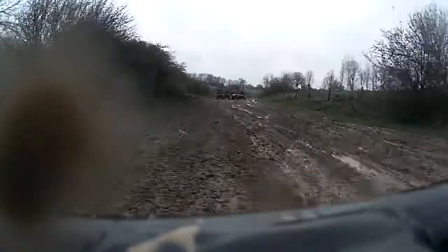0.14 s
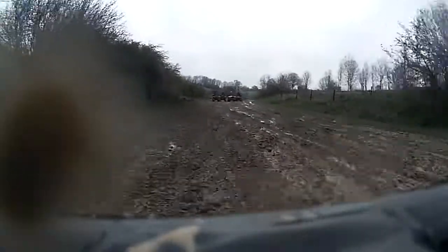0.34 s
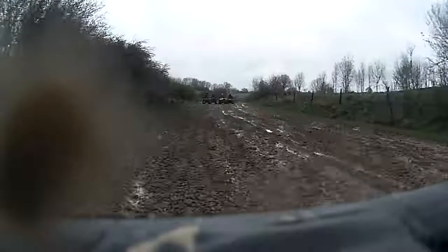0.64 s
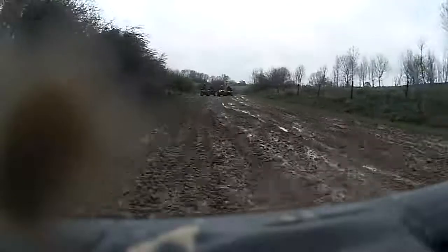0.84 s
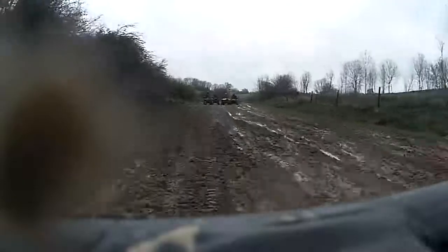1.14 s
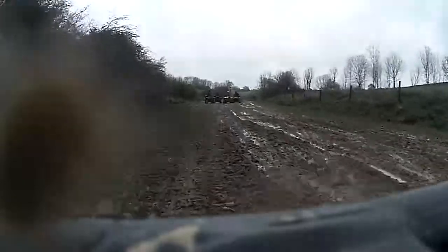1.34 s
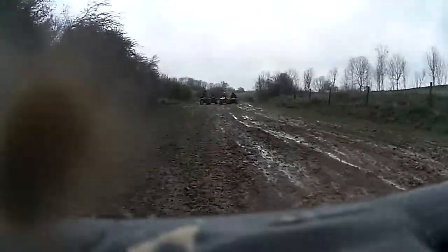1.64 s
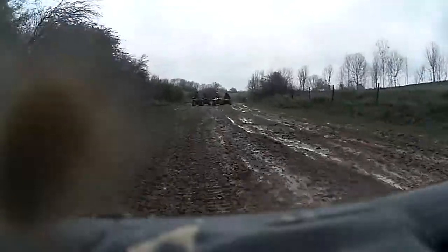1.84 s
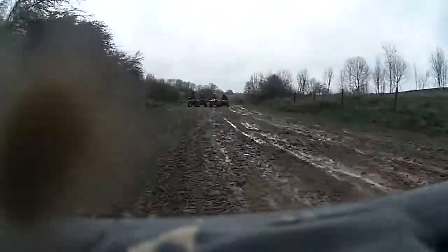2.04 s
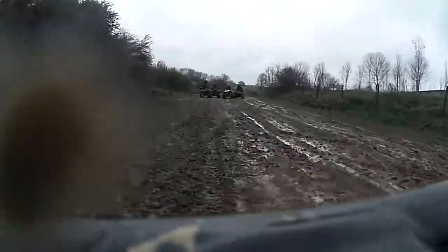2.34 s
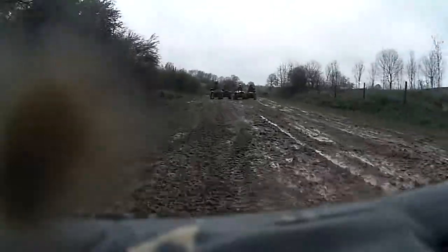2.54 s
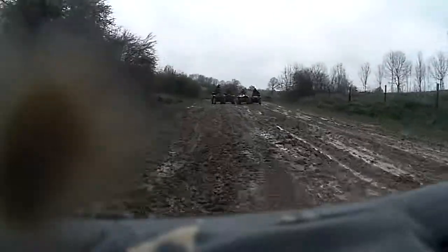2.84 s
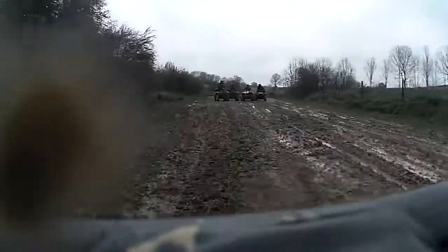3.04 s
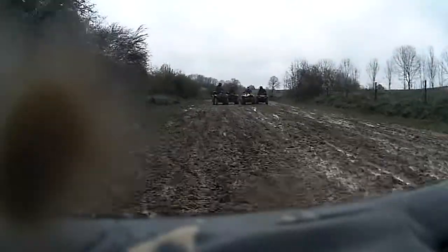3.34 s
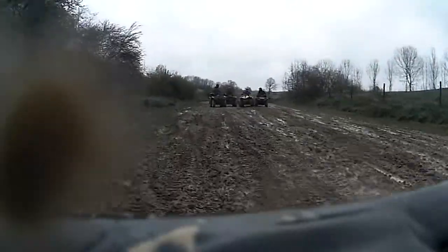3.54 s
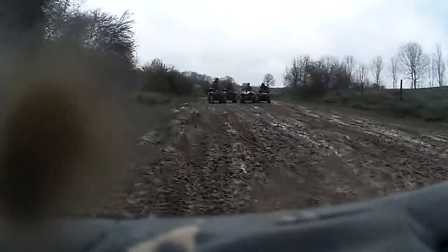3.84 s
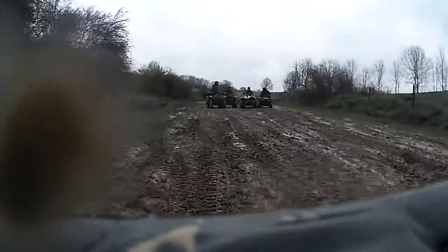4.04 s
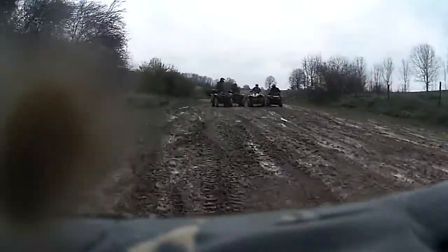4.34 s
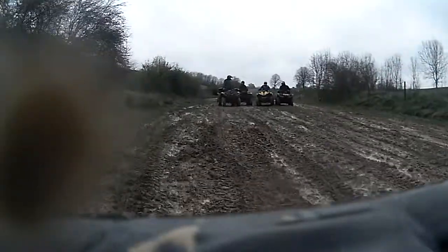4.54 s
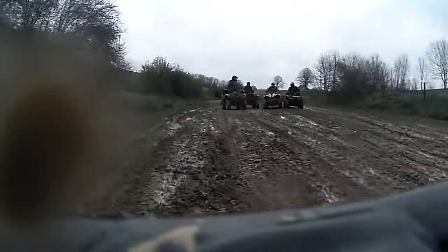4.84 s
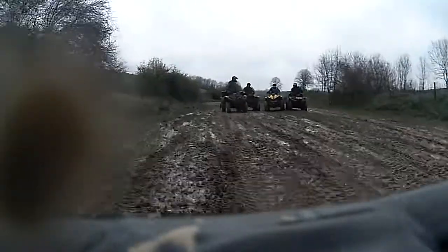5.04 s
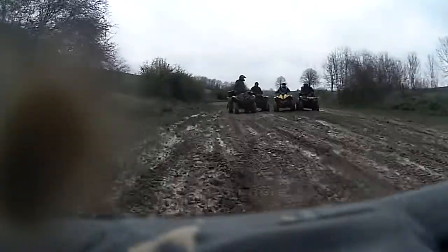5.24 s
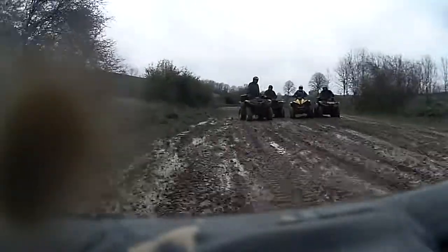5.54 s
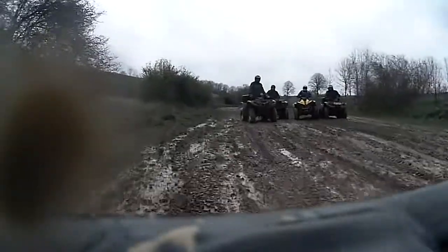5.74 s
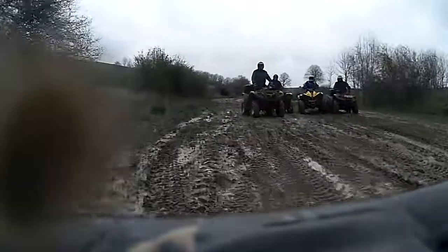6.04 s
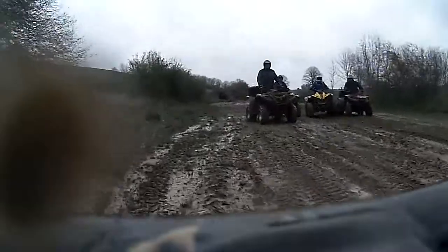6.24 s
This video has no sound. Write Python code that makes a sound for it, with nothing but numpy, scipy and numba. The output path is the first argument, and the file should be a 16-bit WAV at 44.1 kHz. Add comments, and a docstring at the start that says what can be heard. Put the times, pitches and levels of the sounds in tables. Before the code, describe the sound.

A single-cylinder quad bike throbs along a muddy track, bodywork knocking over ruts, then coasts down to a low putter and blips the throttle twice.

```python
"""Quad bike on a muddy track

A single-cylinder quad is heard from a microphone in a closed case on its bodywork. The exhaust, made of multiples of
the firing rate, throbs with the throttle, dies back as the quad coasts and picks up twice near the end. Clatter and buzz
ring the panels, engine cases and microphone case. Ruts knock the bodywork, gears whine as swept tones, tyres churn
mud from coloured grains of noise, flecks tick on the case and the suspension chirps faintly in narrow noise."""
import sys
import numpy as np
from scipy import signal
from scipy.fft import rfft, irfft
from scipy.io import wavfile
from scipy.ndimage import uniform_filter1d
from numba import njit

SR = 44100
rng = np.random.default_rng(int(sys.argv[2]) if len(sys.argv) > 2 else 0)


def unload_wav(signal):
    """Save mono or channel-first audio to the path in sys.argv[1] as 16-bit WAV at rate SR, clipped to [-1, 1]."""
    wavfile.write(
        sys.argv[1],
        SR,
        np.round(np.clip(np.atleast_2d(signal).T, -1, 1) * 32767).astype(np.int16),
    )


N = 281799
TIME = np.arange(N) / SR

# Resonances of the microphone case. Each row: centre in Hz, half-width in Hz, relative level in dB.
SHELL_MODES = [(2784, 47, -12), (2880, 39, -5.5), (3040, 240, -7), (3395, 96, -3.5), (3580, 180, -2.5),
               (3827, 170, 5.5), (3993, 82, -1.5), (4290, 140, -7.5)]
# Hollow body of a plastic knock. Each row: frequency in Hz, relative level in dB.
HOLLOW_TONE = [(200, -37), (500, -6), (600, 5.5), (850, -0.5), (1100, -1.5), (2000, -53)]
# Bright edge of a plastic knock. Each row: frequency in Hz, relative level in dB.
CRACK_TONE = [(700, -19.5), (1150, 5), (1750, -1), (2250, -17), (4000, -18), (4800, -39)]


def undb(db):
    """Decibels to gain."""
    return 10 ** (np.asarray(db) / 20)


def unit(x):
    """Scale to rms 1."""
    return x / np.sqrt(np.mean(x ** 2))


def curves(table):
    """The columns of a table after its times, drawn as straight lines with one value per sample."""
    s, *columns = np.transpose(table)
    return [np.interp(TIME, s, c) for c in columns]


def add(out, s, sound):
    """Mix a short sound in at s seconds."""
    start = int(s * SR)
    out[start:start + len(sound)] += sound[:N - start]


def walk(rate):
    """Slow random drift: steps lasting 1 / rate seconds, smoothed twice over that length; rms 1."""
    k = int(SR / rate)
    steps = np.repeat(rng.standard_normal(N // k + 1), k)
    return unit(uniform_filter1d(uniform_filter1d(steps, k), k)[:N])


def colour(x, points, size=4096):
    """Minimum-phase filter whose response follows the given (Hz, dB) outline."""
    hz, db = np.transpose(points)
    bins = np.maximum(np.fft.rfftfreq(size, 1 / SR), 1)
    outline_db = np.interp(np.log(bins), np.log(hz), db)
    # folding the cepstrum forward in time makes the filter causal
    cepstrum = irfft(np.log(undb(outline_db)))
    cepstrum[1:size // 2] *= 2
    cepstrum[size // 2 + 1:] = 0
    impulse = irfft(np.exp(rfft(cepstrum)))
    return signal.fftconvolve(x, impulse)[:len(x)]


def band(x, hz, width):
    """One resonance of the given width in Hz, gain 1 at its centre."""
    return signal.lfilter(*signal.iirpeak(hz, hz / width, SR), x)


def ring(x, modes):
    """A body of resonances, each filtered twice for steep sides and dark valleys between; rms 1."""
    total = 0
    for hz, half_width, db in modes:
        once = band(x, hz, 2 * half_width)
        total = total + undb(db) * band(once, hz, 2 * half_width)
    return unit(total)


def grains(rate, spread_db):
    """Tiny impacts at random, rate per second, a few made larger by an exponential spread in dB; rms 1."""
    size = undb(spread_db * np.minimum(rng.exponential(size=N), 4))
    struck = rng.random(N) < rate / SR
    return unit(struck * size * rng.standard_normal(N))


def held(start, end, attack_s, release_s):
    """Envelope from 0 to 1: attack from start, hold, release from end."""
    attack = np.clip((TIME - start) / attack_s, 0, 1)
    return attack * np.clip(1 - (TIME - end) / release_s, 0, 1)


def ride():
    """The quad's motion, which drives the levels: firing rate in Hz, throttle opening and ground speed."""
    # Engine speed. Each row: time in seconds, firing rate in Hz.
    revs = [(0.0, 26.7), (0.2, 29.6), (0.6, 30.3), (0.85, 29.2), (1.28, 29.1), (1.55, 32.0), (1.64, 31.3),
            (1.74, 34.2), (1.84, 30.6), (1.97, 30.0), (2.1, 27.1), (2.45, 26.6), (3.0, 23.6), (3.35, 22.1),
            (3.6, 22.3), (4.32, 19.6), (4.92, 18.4), (5.11, 27.4), (5.25, 28.9), (5.47, 26.2), (5.71, 31.2),
            (5.99, 24.9), (6.39, 25.0)]
    # Pulls on the throttle. Each row: opens in seconds, closes in seconds, opening from 0 to 1.
    pulls = [(0.035, 0.617, 0.73), (1.304, 1.76, 0.9), (5.025, 5.294, 0.47), (5.45, 5.73, 0.63)]
    # Ground speed, falling as the quad coasts. Each row: time in seconds, share of top speed.
    speeds = [(0, 1.0), (2.2, 0.81), (3.4, 0.3), (4.7, 0.21), (6.39, 0.26)]
    open_s, close_s = 0.08, 0.22
    throttle = sum(opening * held(start, end, open_s, close_s) for start, end, opening in pulls)
    return curves(revs)[0], throttle, curves(speeds)[0]


def loudness(state, db, octave_db=0, throttle_db=0, speed_db=0):
    """Gain of a part: db at cruising revs, shut throttle and top speed, shifted by revs, throttle and speed."""
    hz, throttle, speed = state
    cruise_hz = 26
    revs_db = octave_db * np.log2(hz / cruise_hz)
    return undb(db + revs_db + throttle_db * throttle + speed_db * (speed - 1))


def lull():
    """Gain for clatter and spray that eases briefly twice and lifts very slightly at the end."""
    # Bell-shaped changes. Each row: middle in seconds, half length in seconds, change in dB.
    dips = [(2.067, 0.068, -2.5), (3.55, 0.077, -4), (6.39, 0.064, 0.5)]
    return undb(sum(db * np.exp(-((TIME - s) / half_s) ** 2) for s, half_s, db in dips))


def through_case(x, edge_hz=4520):
    """The closed case lets little through above its own resonances: a steep low-pass."""
    return signal.sosfilt(signal.butter(18, edge_hz, fs=SR, output="sos"), x)


@njit
def repeat(x, period, keep):
    """Feed each engine cycle into the next, so that the same parts strike at the same crank angles."""
    y = x.copy()
    for i in range(len(x)):
        place = i - period[i]
        if place >= 0:
            k = int(place)
            y[i] += keep * (y[k] + (place - k) * (y[k + 1] - y[k]))
    return y


def clatter(hz, turns, keep, throb, spread_db):
    """Impacts that partly recur every cycle and swell with each firing."""
    strikes = repeat(grains(3000, spread_db), SR / hz, keep)
    return strikes * (1 + throb * np.cos(2 * np.pi * turns))


def buzz(turns, sway_db=3):
    """The smooth part of the engine's shaking: many clean multiples of the firing rate, each swaying slowly."""
    phases = rng.random(40)
    total = 0
    for k in range(6, 40):
        total = total + undb(sway_db * walk(3.996)) * np.cos(2 * np.pi * (k * turns + phases[k]))
    return unit(total)


def exhaust(turns, state):
    """Six multiples of the firing rate: three throb under load, three boom on the overrun, the top two at low revs."""
    # Throb at twice the firing rate. Each row: time in seconds, level in dB.
    throb_levels = [(0, -34), (0.2, -32), (0.6, -29), (0.95, -32), (1.28, -30.5), (1.62, -28),
                    (1.75, -24.5), (2.15, -38), (2.6, -42), (3.15, -53), (3.4, -45.5), (4.88, -42.5),
                    (5.2, -31), (5.48, -34.5), (5.76, -27.5), (6.0, -37.5), (6.39, -37)]
    # Bark at three times the firing rate. Each row: time in seconds, level in dB.
    bark_levels = [(0, -43), (0.17, -30), (0.6, -35), (1.05, -42), (1.4, -34), (1.75, -29.5), (2.1, -48),
                   (3.5, -50), (4.0, -43.5), (4.8, -43), (5.2, -36.5), (5.45, -39), (5.75, -33.5),
                   (5.98, -43), (6.39, -37)]
    # Hollow boom at four times the firing rate. Each row: time in seconds, level in dB.
    boom_levels = [(0, -49), (2.76, -47), (2.92, -34.5), (3.15, -34.5), (3.52, -48), (3.75, -40),
                   (4.45, -35.5), (5.03, -35.5), (5.2, -43), (5.82, -46), (6.0, -37), (6.39, -39.5)]
    throb, bark, boom = (undb(curves(table)[0]) for table in (throb_levels, bark_levels, boom_levels))
    first = throb * loudness(state, db=-22, octave_db=7, throttle_db=12.0)
    fifth = boom * loudness(state, db=-17.0, octave_db=-18.5)
    sixth = boom * loudness(state, db=-20.0, octave_db=-21.0)
    # the boom is reflected from the open end of the pipe, upside down
    gains = [first, throb, bark, -boom, -fifth, -sixth]
    # the silencer's chambers hold higher multiples back a little, smearing each pulse
    smear_turns, waver_db = .025, 1.0
    out = np.zeros(N)
    for k, gain in enumerate(gains, 1):
        wave = np.cos(2 * np.pi * (k * turns - smear_turns * k * k))
        out -= np.sqrt(2) * gain * undb(waver_db * walk(20)) * wave
    return out


def valves(turns, state, hz=4350, half_width_hz=450):
    """The valve gear ticks once per cycle, harder at high revs: noise pulses through one resonance."""
    sharpness = 5
    tick = np.exp(sharpness * np.cos(2 * np.pi * turns)) * rng.standard_normal(N)
    return ring(tick, [(hz, half_width_hz, 0)]) * loudness(state, db=-68.5, octave_db=22, throttle_db=3)


def rack(shaking, state, hz=806, half_width_hz=42, noise_db=14.5):
    """The luggage rack rings on at one pitch from noise, while multiples of the firing rate glide through it."""
    driven = shaking + rng.standard_normal(N) * undb(noise_db)
    return ring(driven, [(hz, half_width_hz, 0)]) * loudness(state, db=-44.5, speed_db=4)


def growl(turns, state, gulp=0.18):
    """The airbox snarls as the throttle opens: high multiples of the firing rate, in one uneven gulp per cycle."""
    hz, half_width_hz, rough_db, jitter_turns = 812, 105, 2.5, .005
    snarl = ring(buzz(turns + jitter_turns * walk(40)), [(hz, half_width_hz, 0)])
    snarl = snarl * undb(rough_db * walk(60)) * (1 + gulp * np.cos(2 * np.pi * turns))
    throttle = state[1]
    return unit(snarl) * throttle * loudness(state, db=-43.0, octave_db=15, speed_db=5.5)


def engine(state, drone_buzz_db=-1, case_buzz_db=-11):
    """Exhaust, airbox, valves and rack, with clatter and buzz that ring the panels and cases."""
    # Body panels. Each row: centre in Hz, half-width in Hz, relative level in dB.
    panel_modes = [(236, 13, -16), (338.7, 34.5, 2), (325, 32, -31), (363, 31, -1), (432.4, 12, -10)]
    # Metal engine cases. Each row: centre in Hz, half-width in Hz, relative level in dB.
    case_modes = [(605.7, 19, -3.5), (656, 51.5, 1), (746, 28.4, -2), (882, 100, -3.5), (1021, 33, -11),
                  (1137, 20, -9), (1387, 41, -6.5), (1467, 30, -7), (1596, 45, -9), (1828, 28, -7),
                  (1903, 23.6, -4.5), (2162, 23, -11), (2294, 28, -12.5)]
    hz = state[0]
    turns = np.cumsum(hz) / SR
    shaking = buzz(turns)
    ease = lull()
    panel_clatter = ring(clatter(hz, turns, keep=0.17, throb=0.27, spread_db=0.0), panel_modes)
    drone = unit(panel_clatter + undb(drone_buzz_db) * ring(shaking, panel_modes))
    case_clatter = clatter(hz, turns, keep=0.44, throb=0.066, spread_db=3.0)
    cases = ring(case_clatter + undb(case_buzz_db) * shaking, case_modes) * ease
    # the rasp is clatter ringing the microphone case
    rasp = ring(clatter(hz, turns, keep=0.51, throb=0.15, spread_db=0), SHELL_MODES) * ease
    return (exhaust(turns, state) + growl(turns, state) + valves(turns, state) + rack(shaking, state) * ease
            + drone * loudness(state, db=-40, octave_db=4.5, throttle_db=4.0, speed_db=6)
            + cases * loudness(state, db=-47, octave_db=5, throttle_db=2.5, speed_db=3.0)
            + rasp * loudness(state, db=-53.0, octave_db=-1.0, throttle_db=6.0, speed_db=2.0))


def whines(state, centre_hz=355, width_hz=47, wobble_hz=3.43, flutter_db=3.0):
    """Gear tones follow the revs and sing out as they cross a panel resonance, mostly on the overrun."""
    # Each row: multiple of the firing rate, level in dB at shut throttle and top speed, change at full throttle in dB.
    gear_tones = [(14, -36.5, -14), (16, -39.5, -14)]
    out = np.zeros(N)
    for multiple, db, throttle_db in gear_tones:
        hz = multiple * state[0] + wobble_hz * walk(20)
        resonance = 1 / (1 + ((hz - centre_hz) / width_hz) ** 4)
        gain = loudness(state, db=db, throttle_db=throttle_db, speed_db=14.5) * undb(flutter_db * walk(40))
        out += resonance * gain * np.sin(2 * np.pi * np.cumsum(hz) / SR)
    return out


def panel_hum(state, hz=335, pull_hz=3.5, wobble_hz=3, flutter_db=3.0):
    """Under load one panel sings at its own pitch, pulled a little by the revs."""
    level_db, closed = -34.5, .22  # closed: share left when the throttle is shut
    pitch = hz + pull_hz * (state[0] - 29.5) + wobble_hz * walk(30)
    gain = (closed + state[1]) * undb(level_db + flutter_db * walk(40))
    gain = gain * loudness(state, db=-1, octave_db=7, speed_db=7)
    return gain * np.sin(2 * np.pi * np.cumsum(pitch) / SR)


def rattles():
    """Lumps of mud tap the hollow mudguards: random strikes, each a decaying burst of noise."""
    rate, decay_s, level_db, crack_db = 45, 0.0071, -2, -10  # rate in strikes per second
    strikes = (rng.random(N) < rate / SR) * rng.random(N)
    envelope = signal.lfilter([1], [1, -np.exp(-1 / (decay_s * SR))], strikes)
    chatter = envelope * rng.standard_normal(N)
    taps = colour(chatter, HOLLOW_TONE) + undb(crack_db) * colour(chatter, CRACK_TONE)
    return unit(taps) * undb(level_db)


def track(state):
    """Tyres rumble through ruts and fling a crackling spray of mud, more at speed; puddles splash over the case."""
    # Wet hollows. Each row: middle in seconds, half length in seconds, splash level in dB, change in rumble in dB.
    wet_hollows = [(0.1, 0.28, -53.5, -4.5), (1.718, 0.17, -50, 3.5)]
    # Tone of the mud spray. Each row: frequency in Hz, relative level in dB.
    mud_tone = [(450, -15), (620, 5), (1000, 3.5), (1500, -14.5), (2100, -6.5), (2900, -2), (3900, 2.5),
                (4350, -7.5), (4650, -27), (7200, -15), (9000, -21.5), (15000, -28)]
    # Tone of the tyre rumble. Each row: frequency in Hz, relative level in dB.
    rumble_tone = [(10, -9), (25, -7), (45, -8.5), (72, 5), (105, 1.5), (150, -7), (250, -9), (450, -12),
                   (700, -54.5)]
    splash, jolt_db = 0, 0
    for s, half_s, splash_db, rumble_db in wet_hollows:
        depth = np.exp(-((TIME - s) / half_s) ** 2)
        splash = splash + undb(splash_db) * depth
        jolt_db = jolt_db + rumble_db * depth
    thrown = loudness(state, db=-49.5, throttle_db=0.4, speed_db=8.5) * lull()
    rolling = loudness(state, db=-38.5, throttle_db=3, speed_db=5.0) * undb(jolt_db)
    rumble = unit(colour(grains(900, 1.6), rumble_tone)) * rolling * undb(1.86 * walk(9.4))
    spray = unit(colour(grains(4000, 0.89), mud_tone)) * thrown * undb(1.8 * walk(21.77))
    wash = band(colour(grains(2500, 3.5), mud_tone), 3700, 2500)
    slosh = unit(through_case(wash)) * splash
    return rumble + spray + slosh + rattles() * thrown


def hiss(level_db=-62.5):
    """Faint even hiss of the microphone: coloured noise at a steady level."""
    # Each row: frequency in Hz, relative level in dB.
    hiss_tone = [(2800, -8.5), (5200, 0.5), (7000, -5), (9000, -6), (10300, -1.5), (14500, -7),
                 (15600, -4.5)]
    return unit(colour(rng.standard_normal(N), hiss_tone)) * undb(level_db)


def knocks(tail_s=0.075, tail_db=-22, width_hz=150, ring_db=11, hollow_db=-14.5, crack_db=-14.0, lead_s=0.00453):
    """Loose plastic bodywork slaps at each rut and chatters briefly: a hollow ring and a brighter crack."""
    # Each row: time in seconds, hollow level in dB and crack level in dB (both before trim), ring pitch in Hz.
    rut_hits = [(0.206, -32.5, -43, 820), (0.510, -24, -38, 780), (0.636, -26, -42, 593),
                (1.123, -35, -32.5, 625), (1.261, -29, -42.5, 770), (1.3, -33, -44, 730),
                (1.497, -21.5, -31.5, 850), (1.619, -24.5, -33, 603), (1.723, -32, -39.5, 780),
                (1.801, -27.5, -53, 795), (1.934, -27.5, -36, 637), (1.963, -32, -50, 610),
                (2.123, -22, -36, 714), (2.169, -39, -41, 620), (2.2, -33.5, -35.5, 630),
                (2.426, -43, -42, 804), (2.541, -32, -47, 570), (2.662, -35, -46, 796),
                (2.777, -46, -41, 818), (2.827, -31.5, -34.5, 760), (2.911, -31.5, -47, 616),
                (3.048, -36, -42.5, 620), (3.133, -38, -44, 607), (3.453, -38, -46, 825),
                (3.546, -38, -49, 807), (3.628, -30, -47, 700), (3.744, -31, -39.5, 780),
                (3.887, -33.5, -46, 810), (4.019, -29.5, -42.5, 680), (4.283, -31, -43, 745),
                (4.376, -33.5, -46, 638), (4.526, -39.5, -48, 770), (5.951, -36, -49, 794),
                (6.019, -30.5, -42, 736), (6.179, -32, -38, 726)]
    out, t = np.zeros(N), TIME[:SR // 10]
    rise_s, decay_s, slap, crack_s = .004, .005, .35, .02
    fall = np.exp(-t / decay_s) + undb(tail_db) * np.exp(-t / tail_s)
    contact = (1 - np.exp(-(t / rise_s) ** 2)) * fall
    for s, low_db, high_db, hz in rut_hits:
        chatter = contact * rng.standard_normal(len(t))
        # one sharp slap amid the chatter
        chatter[int(rise_s * SR)] += slap * np.linalg.norm(chatter)
        hollow = colour(chatter, HOLLOW_TONE)
        hollow = unit(hollow + undb(ring_db) * band(hollow, hz, width_hz))
        crack = unit(colour(chatter * np.exp(-(t / crack_s) ** 2), CRACK_TONE))
        knock = undb(low_db + hollow_db) * hollow + undb(high_db + crack_db) * crack
        # each knock starts slightly ahead of its listed time, so its swell peaks there
        add(out, s - lead_s, knock)
    return out


def flecks(decay_s=0.0075, gain_db=-6, spit_db=-27, spit_hz=5200, spit_width_hz=3000, ring_hz=3950, ring_width_hz=350):
    """Small clots of mud patter on the microphone case: decaying noise rings it, with a faint wet spit."""
    # Each row: start in seconds, level in dB before trim.
    clots = [(0.5567, -34), (0.642, -32), (0.955, -27), (1.5764, -27.5), (2.5083, -29), (2.659, -30.5),
             (2.825, -33), (2.93, -32), (4.4132, -34), (4.461, -30), (4.544, -28.5), (6.192, -39)]
    out, t = np.zeros(N), TIME[:SR // 20]
    for s, db in clots:
        splat = np.exp(-t / decay_s) * rng.standard_normal(len(t))
        shell = ring(splat, SHELL_MODES)
        tick = through_case(shell + 2 * band(shell, ring_hz, ring_width_hz))
        tick = undb(db + gain_db) * tick / np.abs(tick).max()
        spit = undb(db + spit_db) * band(splat, spit_hz, spit_width_hz)
        add(out, s, tick + spit)
    return out


def chirps(width_hz=400, scratch_width_hz=3000):
    """Short, thin, scratchy squeaks of wet suspension joints: noise narrowed by two resonances."""
    # Each row: start in seconds, length in seconds, pitch in Hz, level in dB before the swell and fade.
    squeaks = [(1.015, .04, 10200, -66), (1.16, .04, 10000, -65), (1.5, .045, 6700, -54),
               (1.495, .07, 10000, -57), (1.845, .045, 10000, -64), (2.06, .07, 10000, -59),
               (2.095, .03, 10700, -62), (5.965, .05, 9900, -54), (6.115, .04, 10200, -61),
               (6.18, .025, 10900, -63)]
    out = np.zeros(N)
    for s, length, hz, db in squeaks:
        rub = rng.standard_normal(int(length * SR))
        squeak = unit(band(band(rub, hz, scratch_width_hz), hz, width_hz))
        add(out, s, undb(db) * np.hanning(len(rub)) * squeak)
    return out


def steady_whine(attack_s=0.021, release_s=0.068, wobble_hz=1.58, flutter_db=3.3):
    """A tone comes and goes while the quad rolls slowly and pulls away, all but holding its pitch each time."""
    # Each row: start in seconds, stop in seconds, pitch in Hz, level in dB before flutter.
    spells = [(4.26, 4.427, 423, -46.5), (4.768, 4.984, 395, -43.5), (5.096, 5.346, 424, -39.5),
              (5.153, 5.85, 222.5, -50), (5.5, 5.87, 427.7, -41.5), (6.13, 6.39, 424, -43.5)]
    wobble, flutter = wobble_hz * walk(20), undb(flutter_db * walk(29))
    out = np.zeros(N)
    for start, end, hz, db in spells:
        tone = np.sin(2 * np.pi * np.cumsum(hz + wobble) / SR)
        out += undb(db) * held(start, end, attack_s, release_s) * tone
    return flutter * out


def scene():
    """Everything reaches the one microphone on the bodywork; engine and knocks pass through its case."""
    state = ride()
    enclosed = through_case(engine(state) + knocks())
    tones = whines(state) + panel_hum(state) + steady_whine()
    return (enclosed + flecks() + tones + track(state) + chirps() + hiss())[None]


def record(dry, top_hz=15400):
    """The microphone's steep low-pass cuts the top."""
    return signal.sosfilt(signal.ellip(10, .2, 80, top_hz, fs=SR, output="sos"), dry)


dry = scene()
out = record(dry)
unload_wav(out)
```